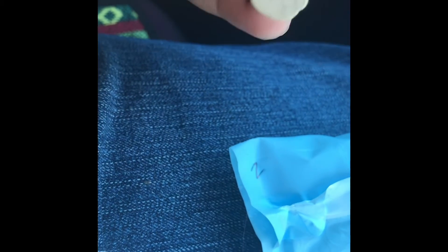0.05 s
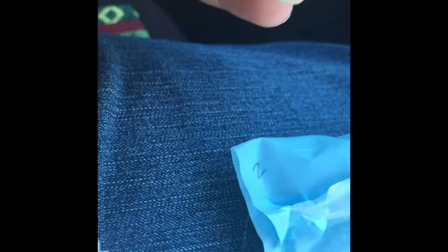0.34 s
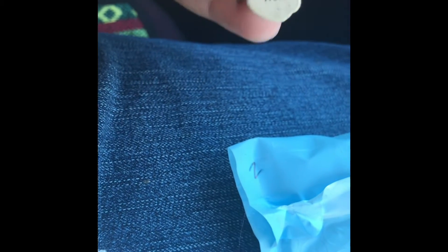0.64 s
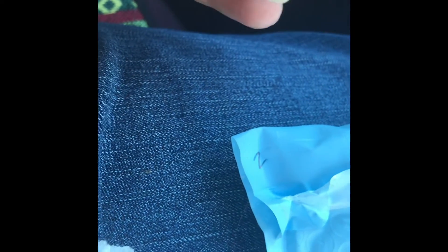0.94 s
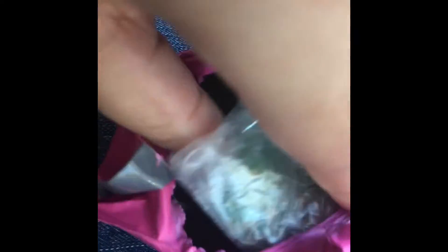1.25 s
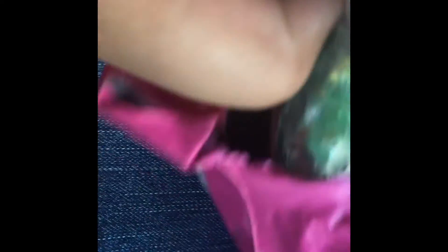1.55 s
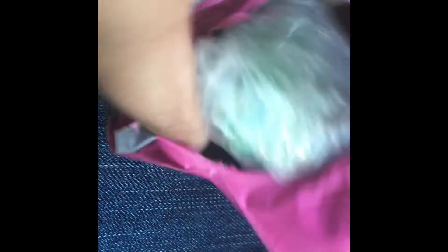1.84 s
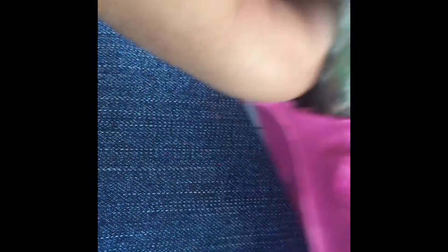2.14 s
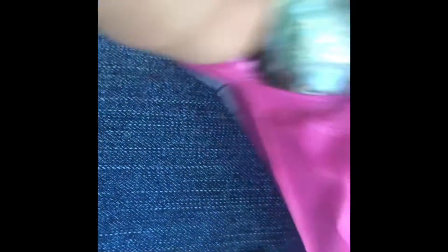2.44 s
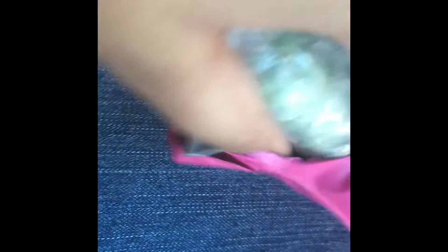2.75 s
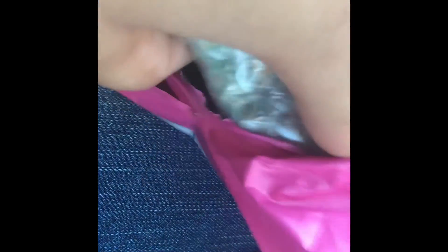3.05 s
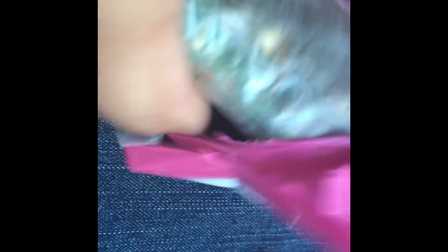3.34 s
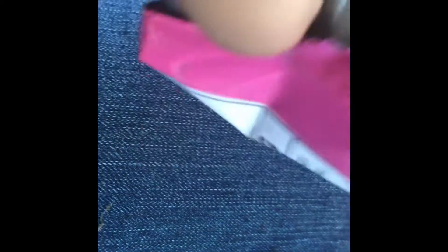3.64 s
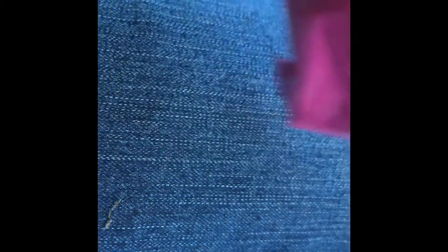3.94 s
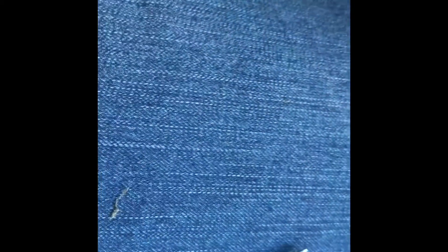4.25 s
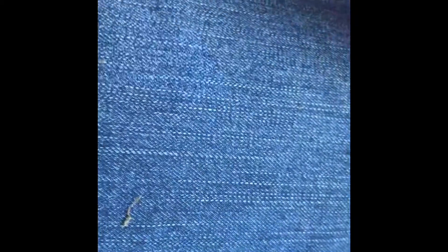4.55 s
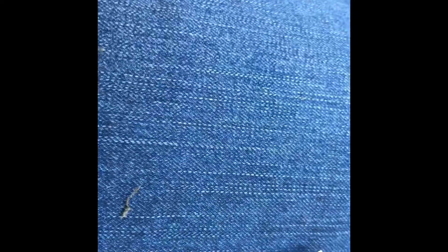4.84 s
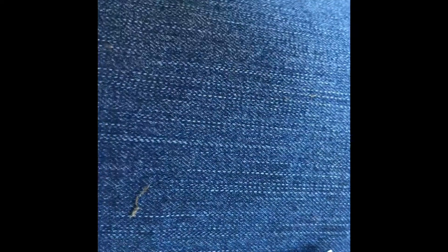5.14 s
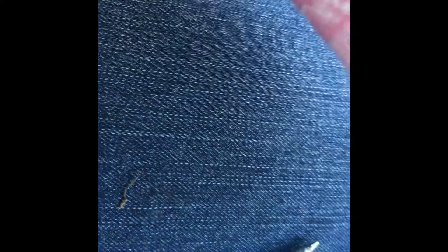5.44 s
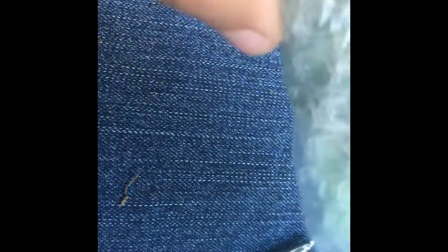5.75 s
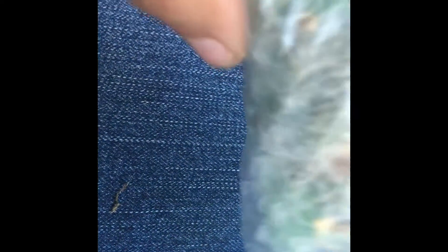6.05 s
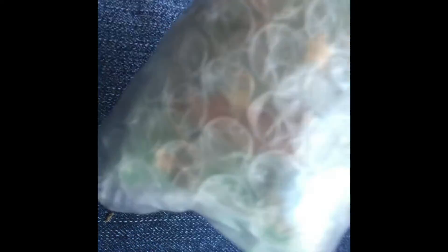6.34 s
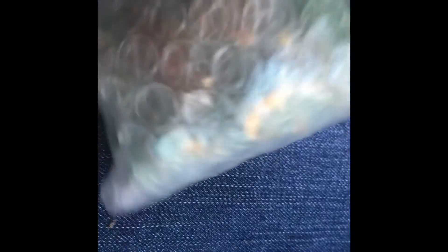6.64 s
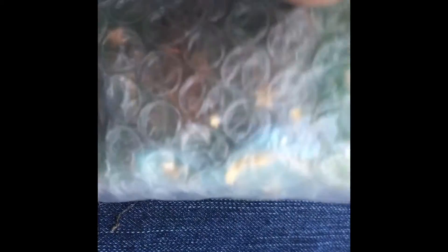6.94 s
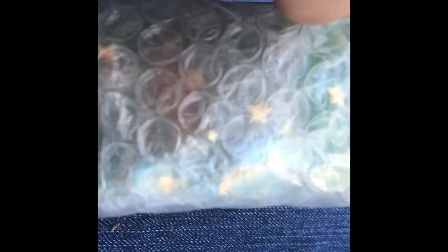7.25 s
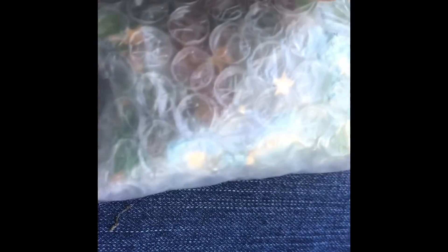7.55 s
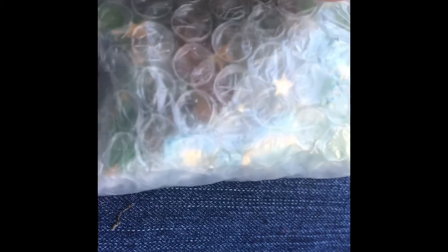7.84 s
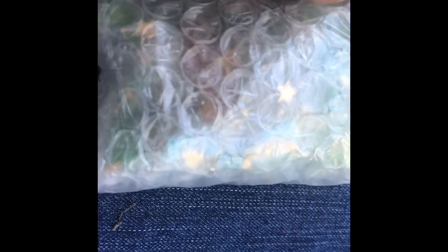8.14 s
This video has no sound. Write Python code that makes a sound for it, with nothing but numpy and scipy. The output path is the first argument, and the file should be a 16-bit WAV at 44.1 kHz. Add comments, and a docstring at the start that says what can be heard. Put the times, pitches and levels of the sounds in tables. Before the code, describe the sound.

Thin plastic packaging crinkles and snaps close by, then bubble wrap rustles more lightly, over a low motor rumble.

```python
"""A low, slightly wavering motor rumble fills a small room. Just after 1 s the whole background drops
out for an instant. Close by, hands dig a wrapped object out of a thin plastic mailer: each squeeze
buckles the film into a rustle of tiny creases and lets bigger ones snap, while the packet bumps on a
lap. Near 2.9 s one hard pull makes the film judder by stick-slip. Later the hands turn over a bubble-wrap
bag. Near 6.4 s a finger rubs the case near the microphone with a thin high squeak; the rustle thins."""
import sys
import numpy as np
from scipy import signal
from scipy.fft import rfft, irfft, next_fast_len
from scipy.io import wavfile
from scipy.ndimage import uniform_filter1d

SR = 44100
rng = np.random.default_rng(int(sys.argv[2]) if len(sys.argv) > 2 else 0)


def store_wav(level_fs):
    """Save 16-bit WAV to argv[1]."""
    pcm = np.round(np.clip(np.atleast_2d(level_fs), -1, 1) * 32767)
    wavfile.write(sys.argv[1], SR, pcm.T.astype(np.int16))


N = 361619
TIME = np.arange(N) / SR

# spectrum of the rumble and air: (frequency [Hz], relative density [dB])
ROOM_SPECTRUM = [(20, -29.5), (36, -16), (58, -3), (90, -0.5), (125, 1), (190, -15), (280, -12),
                 (450, -22.5), (1000, -31), (1700, -37), (2800, -47.5), (6000, -55), (11000, -57.5),
                 (16000, -59)]
# partials of the motor hum: (frequency [Hz], rms level [dB])
MOTOR_HUM = [(47, -38), (70, -46), (276, -60)]
# the motor's faint whine: (frequency [Hz], bandwidth [Hz], rms level [dB])
MOTOR_WHINE = [(4060, 77, -83), (5360, 82, -83.5)]
# the whole background cuts out for an instant: (time [s], gain [dB])
CUT_DROPOUT = [(1.13, 0), (1.16, -11), (1.172, -16), (1.2, 0)]
# the packet bumps and flexes: (time [s], peak level [dB], frequency [Hz], t60 [s])
PACKET_BUMPS = [(1.8278, -9.5, 414, 0.01), (2.106, -29, 607, 0.0086), (2.358, -20, 107.7, 0.059),
                (2.368, -20, 178, 0.057), (2.909, -21, 423, 0.017), (2.989, -12.5, 300, 0.01),
                (3.612, -18, 249, 0.013), (4.762, -27.5, 300, 0.03), (5.7944, -21, 288.5, 0.027),
                (6.231, -23.5, 375, 0.016), (6.4195, -21.5, 590, 0.023)]
# film drags over film: (time [s], duration [s], level [dB], frequency [Hz])
FILM_DRAGS = [(1.829, 0.012, -28, 1700), (1.629, 0.093, -43.5, 1514), (2.103, 0.0095, -28, 1237),
              (2.46, 0.039, -37.5, 620), (2.905, 0.0047, -26, 2200), (2.96, .045, -37.5, 785),
              (4.375, 0.022, -40.5, 810), (4.52, 0.044, -51, 1400), (4.75, 0.054, -51, 1510),
              (4.915, 0.026, -43.5, 2400), (5.038, 0.01, -45, 1455), (5.075, 0.08, -53, 1350),
              (5.203, 0.029, -48, 1487), (6.369, 0.047, -50, 950), (6.407, 0.023, -30, 1520)]
# a finger rubs the case: (time [s], duration [s], level [dB], gain of the upper modes [dB])
FINGER_SQUEAKS = [(1.6, 0.25, -52, -18), (6.364, 0.28, -47, -7.5), (7.632, 0.012, -34.5, -1.5),
                  (7.637, .016, -42, -0.5)]
# resonances of the microphone port in the case: (frequency [Hz], bandwidth [Hz], gain [dB])
PORT_RESONANCES = [(3760, 130, 6), (3960, 150, -4.5), (8160, 300, -10), (8705, 440, -2), (10130, 200, -1),
                   (12600, 1100, -1.5), (15200, 400, -16.5)]
# response of the plastic, which filters all rustle and snaps: (frequency [Hz], gain [dB])
FILM_RESPONSE = [(200, -2), (400, -0.5), (600, 6.5), (760, -6.5), (1050, 4.5), (1600, 1), (2200, -2),
                 (3000, -1), (3600, -2.5), (4300, 1), (4900, -2), (6300, 2.5), (7700, 1), (9300, 2),
                 (10400, -3.5), (12500, 2), (16000, -6.5)]
# light contact of the hands between squeezes: (time [s], crinkle drive [dB])
LIGHT_CONTACT = [(1.17, -61.5), (1.2, -47), (3.1, -46), (3.9, -43.5), (4.05, -55.5), (4.45, -51.5),
                 (4.7, -65), (5, -51), (5.7, -51), (6.8, -48.5), (7.3, -58), (7.55, -57.5), (7.9, -66),
                 (8.2, -60)]
# each squeeze or pull:
# (time [s], hold [s], crinkle drive [dB], relative drive of broad folds [dB], of fine fizz [dB])
HAND_SQUEEZES = [(1.174, 0.1, -43.5, -6, 2.5), (1.256, 0.12, -38.5, -4, 2.5),
                 (1.394, 0.17, -36.0, -2.5, -1), (1.564, 0.16, -39, -2, -7), (1.71, 0.18, -36.0, -3, 0.5),
                 (1.897, 0.21, -35.5, -6.0, 1.5), (2.13, 0.14, -42, -4.5, -0.5),
                 (2.31, 0.13, -37.5, -3.5, 1.5), (2.423, 0.16, -39.5, -1.5, -2),
                 (2.584, 0.28, -39.5, -3, -0.5), (2.833, 0.14, -39, 3, -7), (3.03, 0.026, -40, 1.5, -5),
                 (3.125, 0.14, -37.5, -2, -4), (3.305, 0.068, -35, -11, 0.0),
                 (3.454, 0.072, -31.5, -8.5, -0.5), (3.542, 0.11, -32.5, -3.5, 0.5),
                 (3.691, 0.31, -45.5, -3.5, -17), (4.064, 0.11, -53, -5.0, -1.0),
                 (4.235, 0.18, -46.0, -4, -0.5), (4.482, 0.16, -49, -0.5, -0.5),
                 (4.724, 0.093, -54, 7.5, -5), (4.884, 0.045, -40.5, -7.5, -2.5),
                 (5.042, 0.12, -45.5, 0.5, -2.5), (5.175, 0.11, -42.0, -3, -2.0),
                 (5.336, 0.05, -47, -5.0, -3.5), (5.442, 0.055, -43, -5.5, -3.5),
                 (5.577, 0.057, -37.5, -4, -3), (5.763, 0.059, -38.5, -10, -3),
                 (5.826, 0.12, -48.5, -9.5, 1.5), (6.101, 0.085, -39.5, -10.5, -2),
                 (6.201, 0.074, -37.0, -6.0, -2.0), (6.347, 0.14, -41.5, -3.5, -0.5),
                 (6.541, 0.11, -38.5, -6, -0.5), (6.729, 0.055, -40.5, -4.5, 0),
                 (6.922, 0.14, -52, -6, -1.5), (7.16, 0.038, -52.5, -14.5, 4.5),
                 (7.676, 0.085, -54.0, 1, -5), (7.943, 0.15, -55.5, 0, 1.5)]
# loud creases snap through: (time [s], body drive [dB], frequency [Hz], sharp edge drive [dB])
LOUD_CREASES = [(1.23, -32.5, 4200, -30.5), (1.305, -23.5, 5160, -38.5), (1.3575, -31, 4060, -27),
                (1.3648, -26.5, 3410, -29), (1.4546, -24, 1977, -42), (1.466, -24.5, 1993, -39.5),
                (1.5019, -26.5, 2205, -29), (1.5973, -21, 2994, -29.5), (1.6425, -26.5, 2330, -34.5),
                (1.7076, -24, 3770, -39), (1.736, -19.5, 5810, -20), (1.826, -8, 2544, -21),
                (1.8641, -19.5, 5290, -34), (1.8946, -22, 4924, -23.5), (1.9971, -17, 3786, -16),
                (2.0234, -21.5, 4860, -37.5), (2.0369, -23, 5910, -37.5), (2.0639, -24, 4200, -29),
                (2.1053, -13.5, 4070, -25), (2.1219, -18, 2452, -18), (2.2654, -26.5, 2747, -41),
                (2.3396, -20.5, 2243, -48.5), (2.379, -21.5, 6280, -18), (2.469, -23.5, 1398, -39),
                (2.5179, -17, 2340, -42), (2.5647, -20, 2173, -31.5), (2.8407, -20.5, 1607, -42.5),
                (2.9097, -17, 2174, -30.5), (2.9174, -19, 5000, -24), (2.9314, -19, 5600, -28),
                (2.972, -22.5, 5200, -38), (2.9888, -14, 2150, -43), (3.0571, -21.5, 2283, -40),
                (3.156, -13.5, 2163, -38), (3.2484, -22, 2500, -36), (3.2763, -23.5, 1815, -40),
                (3.34, -23.5, 1554, -28.5), (3.475, -21.5, 1840, -37.5), (3.5078, -21.5, 3630, -27.5),
                (3.6072, -17, 2600, -30), (3.6128, -14, 2640, -21.5), (3.654, -24.5, 1317, -26),
                (3.6856, -24.5, 1190, -42), (3.724, -25, 2300, -39.5), (3.801, -28.5, 1510, -45),
                (3.8376, -27.5, 1406, -46), (3.9242, -24.5, 3980, -42), (4.202, -37, 4675, -40.5),
                (4.28, -38, 5020, -32.5), (4.32, -26, 2297, -42), (4.3608, -28, 1002, -51.5),
                (4.5871, -31.5, 1075, -53.5), (4.8136, -31, 1490, -54), (5.0343, -29.5, 1778, -42),
                (5.1805, -28.5, 7080, -34), (5.2758, -25.5, 3000, -38.5), (5.3158, -34.5, 1820, -54),
                (5.386, -28, 3680, -31), (5.4208, -29, 6050, -22.5), (5.4887, -28.5, 4060, -33),
                (5.6233, -25, 3662, -35), (5.627, -24.5, 2137, -36.5), (5.6814, -33, 6080, -32),
                (5.7944, -16, 2165, -22.5), (5.9548, -30, 1433, -47), (6.2309, -19.5, 2424, -31.5),
                (6.4925, -32, 6290, -37.5), (6.5104, -31, 4910, -44), (7.0906, -37.5, 884, -57),
                (7.404, -32, 1323, -56), (7.6897, -33, 1633, -56.5), (7.723, -35.5, 1810, -55),
                (7.9857, -39.5, 1800, -44)]

FIRST_TOUCH_S = LIGHT_CONTACT[0][0]
FIRM_GRIP_DB = -40  # crinkle drive of a firm grip


def undb(db):
    """Amplitude ratio of a level in decibels."""
    return np.exp(np.asarray(db) * (np.log(10) / 20))


def unit(x):
    """Normalisation to rms 1."""
    return x / np.sqrt(np.mean(x ** 2) + 1e-18)


def curve(points):
    """Linear interpolation of (time, value) points."""
    return np.interp(TIME, *np.transpose(points))


def add(out, start_s, sound):
    """Superposition of a sound from a given time on."""
    i = int(start_s * SR)
    out[i:i + len(sound)] += sound[:N - i]


def fade(t60, samples):
    """Exponential damping, by 60 dB in t60 seconds."""
    return np.exp(-np.log(1000) * TIME[:samples] / t60)


def band(x, lo_hz, hi_hz, order=2):
    """Band-pass filtering between two edges."""
    return signal.lfilter(*signal.butter(order, [lo_hz, min(hi_hz, SR / 2 - 1)], "band", fs=SR), x)


def ring(x, hz, width_hz):
    """Forced response of one resonance, with gain 1 at its centre."""
    return signal.lfilter(*signal.iirpeak(hz, hz / min(width_hz, SR / np.pi), fs=SR), x)


def colour(x, points):
    """Minimum-phase filtering through (Hz, dB) points, from the cepstrum of the gain."""
    size = 2 * next_fast_len(N // 2 + 4096)
    hz, db = np.transpose(points)
    bins_hz = np.arange(size // 2 + 1) * SR / size
    gain = undb(np.interp(np.log(bins_hz + 1), np.log(hz), db))
    cepstrum = irfft(np.log(gain))[:size // 2]
    response = np.exp(2 * rfft(cepstrum, size) - cepstrum[0])
    return irfft(rfft(x, size) * response)[:N]


def smooth(x, seconds):
    """Running mean with triangular weighting."""
    width = max(int(seconds * SR), 1)
    return uniform_filter1d(uniform_filter1d(x, width), width)


def wander(per_s):
    """Random modulation of rms 1: chance values joined by straight lines."""
    return unit(np.interp(TIME * per_s, np.arange(1024), rng.standard_normal(1024)))


def diffuse_tail(x, lo_hz, hi_hz, t60, db):
    """Diffuse decay: a band's energy dies away as noise, since the sheet keeps changing shape."""
    retained = np.exp(-2 * np.log(1000) / (t60 * SR))
    energy = signal.lfilter([1 - retained], [1, -retained], band(x, lo_hz, hi_hz) ** 2)
    return undb(db) * np.sqrt(energy) * unit(band(rng.standard_normal(N), lo_hz, hi_hz))


def motor_rumble(waver=.025, throb_db=1.5, air_db=-38.5):
    """Frequency and amplitude modulation make a hum waver, amid a thin whine and dull noise."""
    motor_time = np.cumsum(1 + waver * wander(12)) / SR
    hum = sum(undb(db + throb_db * wander(7)) * np.sqrt(2) * np.sin(2 * np.pi * hz * motor_time)
              for hz, db in MOTOR_HUM)
    noise = rng.standard_normal(N)
    whine = sum(undb(db) * unit(ring(noise, hz, width)) for hz, width, db in MOTOR_WHINE)
    air = undb(air_db + wander(6.5) / 2) * unit(colour(rng.standard_normal(N), ROOM_SPECTRUM))
    return hum + whine + air


def lap_shuffle(crinkle_db, firm_db=-46):
    """Friction of the packet shifting on the lap: a soft low noise that follows the handling."""
    gain = undb(firm_db + (crinkle_db - FIRM_GRIP_DB) / 2)
    return gain * unit(band(rng.standard_normal(N), 112, 294))


def packet_bumps(samples=4000):
    """Damped free vibration: each bump excites one low mode of the packet."""
    out = np.zeros(N)
    for start, db, hz, t60 in PACKET_BUMPS:
        add(out, start, undb(db) * fade(t60, samples) * np.sin(2 * np.pi * hz * TIME[:samples]))
    return out


def stick_slip(seconds):
    """Stick-slip friction: uneven clicks that swell quickly and die away."""
    progress = np.linspace(0, 1, int(seconds * SR))
    slips = rng.standard_normal(SR)[:len(progress)]
    return slips * np.abs(slips) * np.sin(np.pi * progress ** 0.57)


def film_drags():
    """Sliding friction of film on film rasps in a broad band."""
    out = np.zeros(N)
    for start, seconds, db, hz in FILM_DRAGS:
        rasp = band(stick_slip(seconds), hz / 1.86, hz * 1.66, order=3)
        add(out, start, undb(db) * unit(rasp))
    return out


def finger_squeaks():
    """Forced resonance: a finger slipping on the case rings the high modes of the microphone port."""
    out = np.zeros(N)
    for start, seconds, db, upper_db in FINGER_SQUEAKS:
        slips = stick_slip(seconds)
        modes = sum(undb(mode_db + upper_db * (k > 0)) * ring(slips, hz, width)
                    for k, (hz, width, mode_db) in enumerate(PORT_RESONANCES))
        add(out, start, undb(db) * unit(modes))
    return out


def handling(attack_s=.034, release_t60=.11):
    """Incoherent sources add in power: contact and squeezes drive crinkle, folds and fizz, in dB."""
    contact_shares_db = np.array([[0], [-5], [-0.2]])
    power = undb(curve(LIGHT_CONTACT) + contact_shares_db) ** 2
    for start, hold, db, folds_db, fizz_db in HAND_SQUEEZES:
        age = TIME[:int((hold + release_t60) * SR)]
        attack = np.minimum(age / attack_s, 1)
        release = np.exp(-np.log(1000) * np.maximum(age - hold, 0) / release_t60)
        for layer, share_db in zip(power, (0, folds_db, fizz_db)):
            add(layer, start, (attack * release * undb(db + share_db)) ** 2)
    return 10 * np.log10(power)


def rustle(crinkle_db, folds_db, fizz_db, firm_per_s=950, spread_db=3.5, scatter_db=4.5, rub_db=-10):
    """Shot noise: tiny creases buckle, more often under a firmer grip, over the hiss of sliding film."""
    chance = firm_per_s / SR * undb(.55 * (crinkle_db - FIRM_GRIP_DB) + 2 * wander(30))
    sizes = undb(spread_db * np.minimum(rng.exponential(size=N), 4.5))
    clicks = (rng.random(N) < chance) * sizes * rng.choice([-1, 1], N)
    rub = undb(rub_db) * np.sqrt(chance) * rng.standard_normal(N)
    # large facets sound low, small ones high: (low edge [Hz], high edge [Hz], weight [dB])
    layers = [(folds_db - 1.5, [(171, 490, -6), (566, 1230, -1.5), (1210, 2200, -0.5)]),
              (crinkle_db - 0.14, [(1950, 3550, 1), (3150, 4930, -3.0), (4730, 6900, -3.2)]),
              (fizz_db + 0.3, [(6470, 12400, -0.49), (10900, 18000, -1.5)])]
    out = np.zeros(N)
    for layer_db, facets in layers:
        grains = np.zeros(N)
        for lo_hz, hi_hz, db in facets:
            pushes = clicks * undb(scatter_db * rng.standard_normal(N)) + rub
            grains += undb(db + 2.7 * wander(25)) * band(pushes, lo_hz, hi_hz)
        grains += diffuse_tail(grains, facets[0][0], facets[-1][1], t60=0.045, db=-4.0)
        running_rms = np.sqrt(np.abs(smooth(grains ** 2, seconds=0.031)) + 1e-9)
        out += grains / running_rms * undb(layer_db)
    tremor = undb(1.38 * wander(36))  # the film gives way unevenly under the fingers
    return out * tremor * (TIME > FIRST_TOUCH_S)


def snaps(creases, base_t60=0.0037, flutter_db=-31, tick_db=-4, neighbours_db=-5, samples=900):
    """Snap-through buckling: a crease yields in quick slips, its facet rings, the sheet flutters."""
    out = np.zeros(N)
    flutter_envelope = undb(flutter_db) * fade(.02, samples)
    one_ms_gain = np.sqrt(SR / 1000 / samples)  # gives an rms-1 snap the energy of 1 ms at rms 1
    draws = rng.standard_normal((len(creases), 3, samples))
    for (start, db, hz, edge_db), (slips, flutter, chance) in zip(creases, draws):
        # a larger crease takes longer to give way
        slip_envelope = fade(base_t60 * undb(0.3 * (db + 20)), samples)
        push = 0.13 * np.clip(slips, -2.5, 2.5) ** 3 * slip_envelope + flutter * flutter_envelope
        push[0] += 1.4
        facet = unit(band(ring(push, hz, hz / 2), hz / 4, 1.65 * hz, order=1))
        # three neighbouring facets of chance size ring along
        neighbours_hz = hz * 2 ** (0.19 + 1.02 * np.tanh(chance[:3]))
        signs = np.sign(chance[-3:])
        neighbours = sum(sign * ring(push, f, f / 10) for f, sign in zip(neighbours_hz, signs))
        # the slip itself ticks, duller on a large fold, and the sheet shoves a little air
        tick = undb(tick_db) * unit(band(push, 545, min(4.3 * hz, 8000), order=3))
        puff = undb(-14) * unit(band(push, 310, 810))
        body = unit(facet + undb(neighbours_db) * unit(neighbours) + tick + puff)
        edge = unit(band(push * fade(0.009, samples), 10600, 15400, order=3))
        add(out, start, (undb(db) * body + undb(edge_db + 1) * edge) * one_ms_gain)
    return out


def stray_creases(crinkle_db, centre_hz=4070, octaves=.55, over_db=8, scatter_db=2, count=90):
    """Random buckling: lesser creases snap more often and louder under a firmer grip."""
    grip_db = crinkle_db - FIRM_GRIP_DB
    strain = np.cumsum(undb(grip_db / 2) * (TIME > FIRST_TOUCH_S))
    times = np.interp(rng.random(count) * strain[-1], strain, TIME)
    size, pitch = rng.standard_normal((count, 2)).T
    db = FIRM_GRIP_DB + over_db + .75 * np.interp(times, TIME, grip_db) + scatter_db * size
    hz = np.clip(centre_hz * 2 ** (octaves * pitch), 1000, 7000)
    creases = np.transpose([times, db, hz, db - 6])
    return snaps(creases, base_t60=0.0021, flutter_db=-38, tick_db=-5, neighbours_db=-3)


def judder(start_s=2.859, per_s=110, jitter_s=.001, hz=1680, octaves=0.079, count=15):
    """Relaxation oscillation: taut film sticks and slips, each slip a dry snap of the same fold."""
    body_db, edge_db = -20.5, -37
    slips = [(start_s + k / per_s + jitter_s * late, body_db, hz * 2 ** (octaves * pitch), edge_db)
             for k, (late, _, pitch) in enumerate(rng.standard_normal((count, 3)))]
    return snaps(slips, base_t60=0.0013, flutter_db=-44.5, tick_db=0, neighbours_db=-9)


def scene():
    """Superposition of close plastic, the short dull reflections of a padded space and the rumble."""
    crinkle_db, folds_db, fizz_db = handling()
    creases = snaps(LOUD_CREASES) + judder() + stray_creases(crinkle_db)
    film = colour(creases + rustle(crinkle_db, folds_db, fizz_db), FILM_RESPONSE)
    plastic = film + packet_bumps() + film_drags() + finger_squeaks()
    reflections = (diffuse_tail(plastic, 165, 710, t60=0.033, db=-4)
                   + diffuse_tail(plastic, 760, 2220, t60=0.027, db=-5.5)
                   + diffuse_tail(plastic, 1840, 10200, t60=0.047, db=-12.0))
    foreground = plastic + reflections + lap_shuffle(crinkle_db)
    background = motor_rumble() * undb(curve(CUT_DROPOUT))
    return (foreground + background)[None]


def record(dry, cutoff_hz=15950):
    """Soft saturation rounds the highest peaks; low-pass filtering cuts the top of the treble."""
    low_pass = signal.ellip(10, .1, 70, cutoff_hz, fs=SR, output="sos")
    return signal.sosfilt(low_pass, np.tanh(dry))


dry = scene()
out = record(dry)
store_wav(out)
```